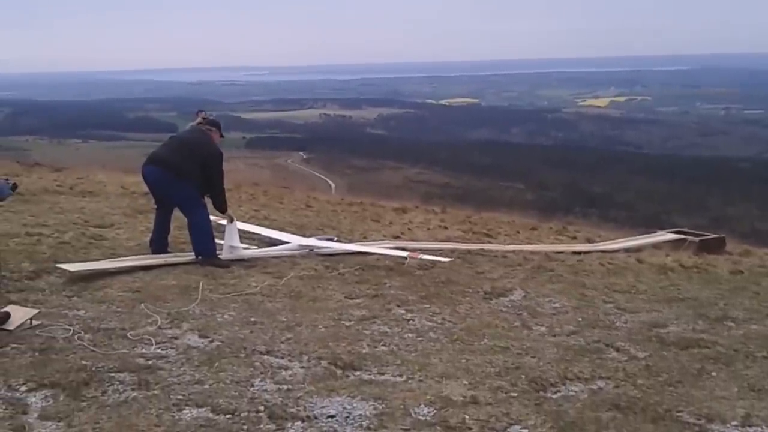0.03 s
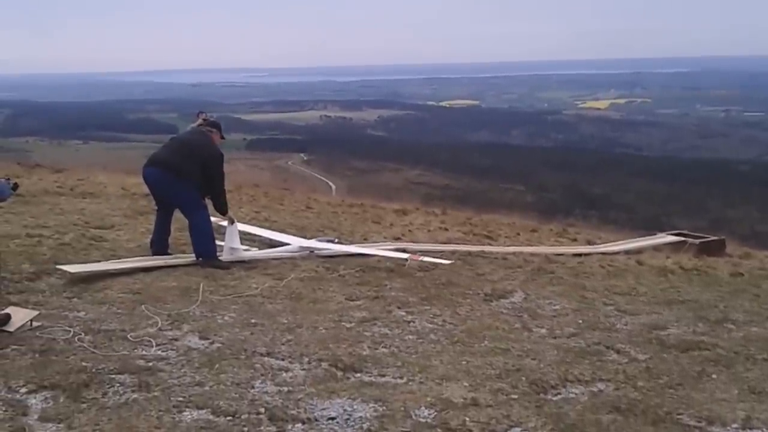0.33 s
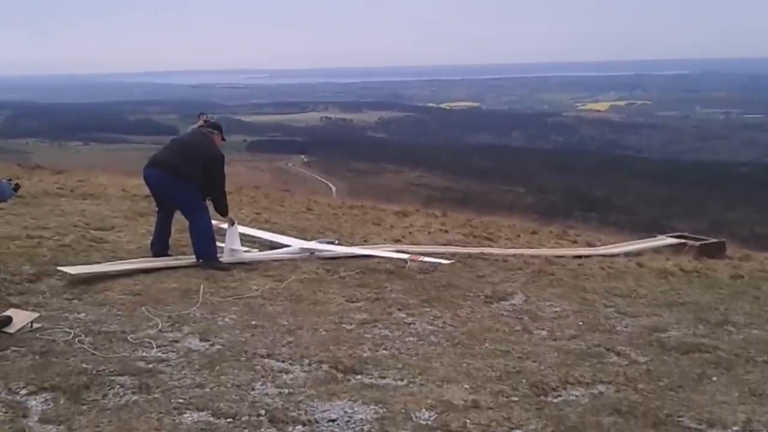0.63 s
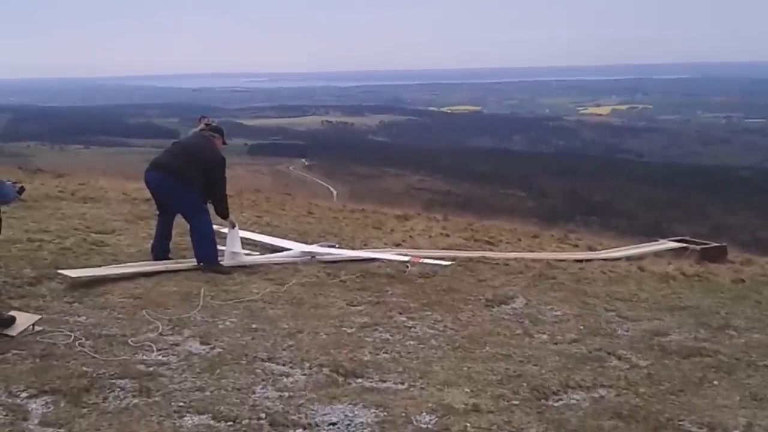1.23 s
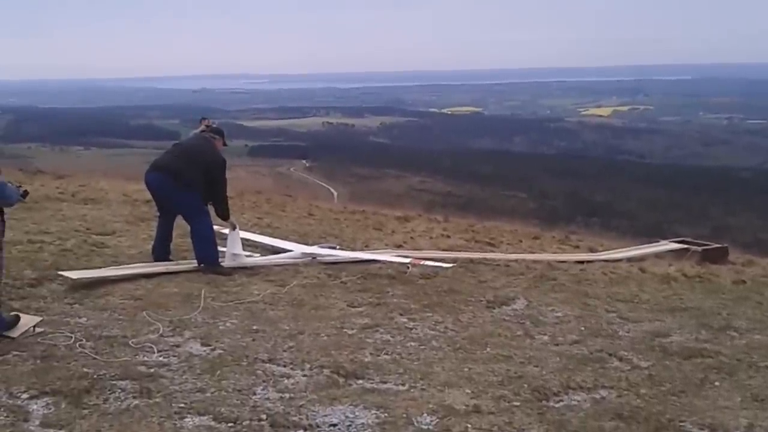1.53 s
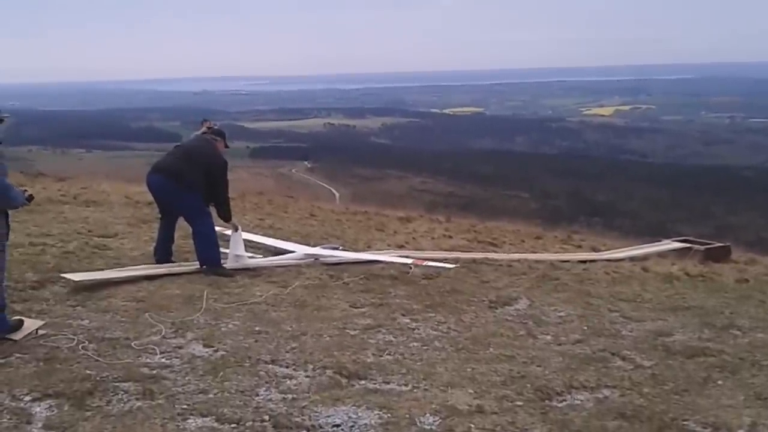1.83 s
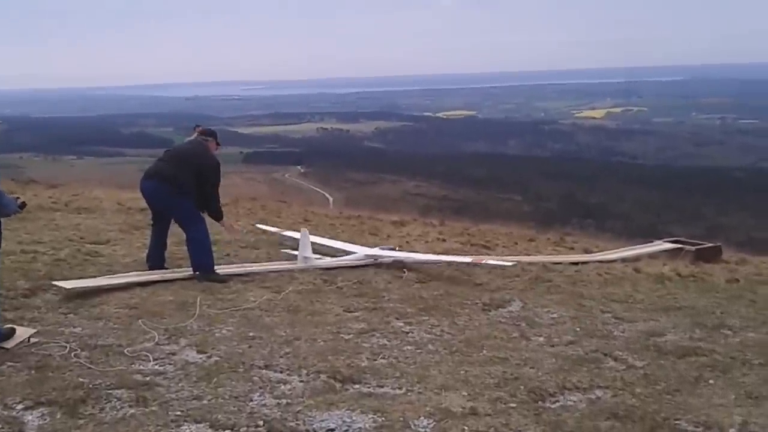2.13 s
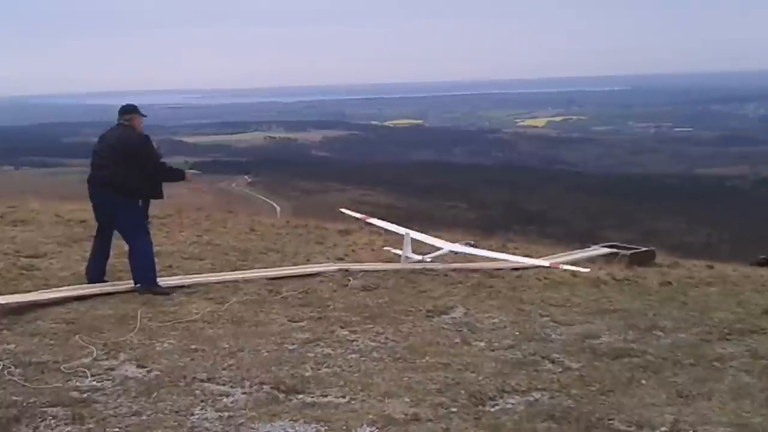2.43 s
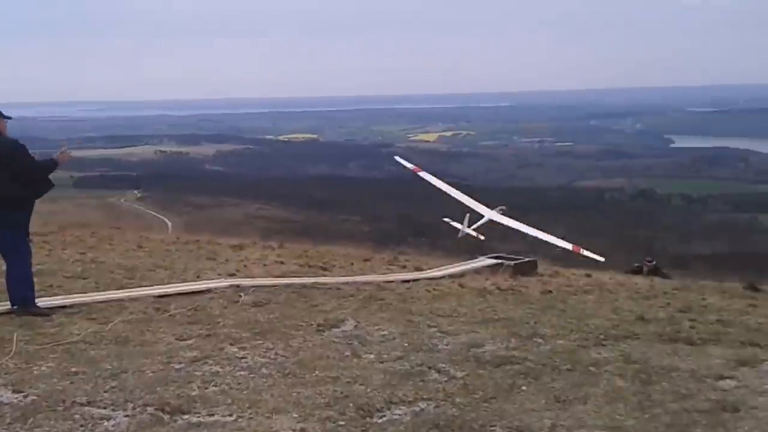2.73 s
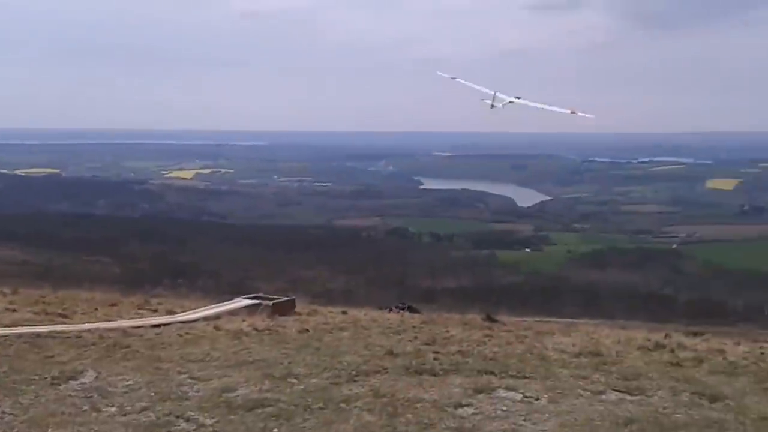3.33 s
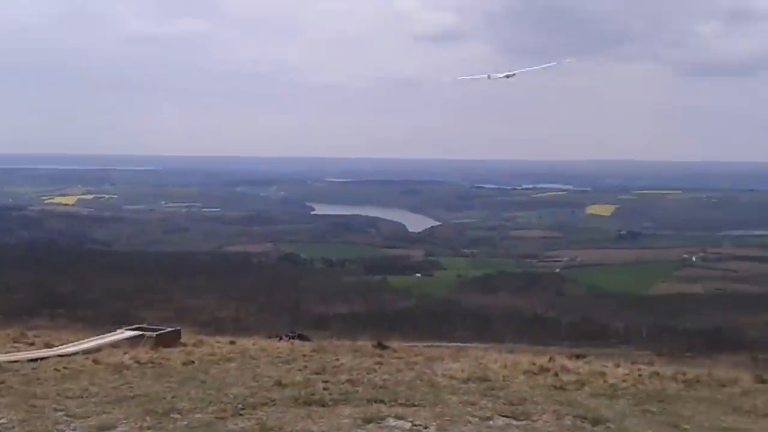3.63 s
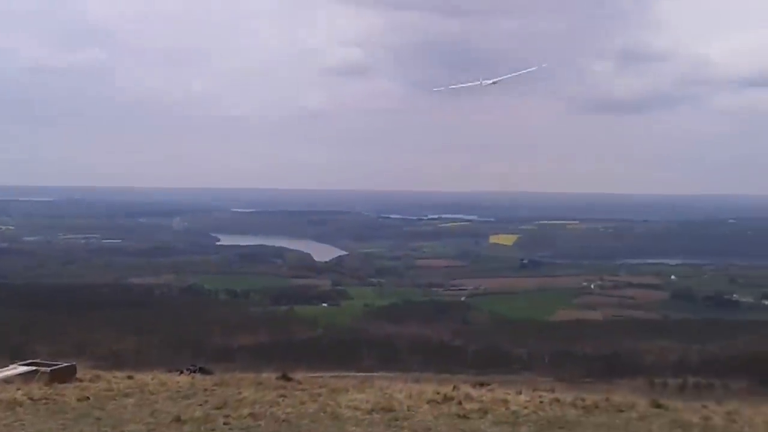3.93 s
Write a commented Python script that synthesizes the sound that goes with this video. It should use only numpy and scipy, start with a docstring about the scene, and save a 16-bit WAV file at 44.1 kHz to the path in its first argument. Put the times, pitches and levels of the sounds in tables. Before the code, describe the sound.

Gusty wind buffets the microphone while a model glider rattles faintly off a wooden ramp.

```python
"""On a grassy hilltop, gusty wind buffets a camera microphone, whistles across its port (the
small sound opening) and overloads it. Swirling air makes the rumble; air crossing the port's edge
makes the whistle. Under the wind, a model glider squeaks as it is handled, clicks on its wooden
ramp, slides away with a thin hiss and launches with a rattling, whirring rush."""
import sys
import numpy as np
from scipy import signal
from scipy.fft import rfft, irfft
from scipy.io import wavfile
from scipy.ndimage import map_coordinates

SR = 44100
rng = np.random.default_rng(int(sys.argv[2]) if len(sys.argv) > 2 else 0)


def materialize(psi):
    """Save the field psi as 16-bit PCM at rate SR to the path in sys.argv[1].

    A 1-D psi becomes a single channel; in a 2-D psi each row is a channel.
    """
    bounded = np.clip(np.atleast_2d(psi).T, -1, 1)
    quanta = np.round(bounded * 32767).astype(np.int16)
    wavfile.write(sys.argv[1], SR, quanta)


N = 176400  # 4 seconds
TIME = np.arange(N) / SR
FREQS = np.fft.rfftfreq(N, 1 / SR)


def amp(db):
    """Turns decibels into a number to multiply by."""
    return 10 ** (np.asarray(db) / 20)


def unit(x):
    """Scales a signal to an average strength (rms) of 1."""
    return x / np.sqrt(np.mean(x ** 2) + 1e-20)


def curve(table, column=1):
    """One column of a table, joined by straight lines through time."""
    rows = np.array(table, float)
    return np.interp(TIME, rows[:, 0], rows[:, column])


def on_freqs(hz, values):
    """Joins values by straight lines from low to high pitch, with octaves evenly spaced."""
    return np.interp(np.log(FREQS + 1), np.log(hz), values)


def filtered(x, gains):
    """Turns each frequency in a signal up or down by its own gain."""
    return irfft(rfft(x) * gains, N)


def noise(colour):
    """Noise shaped by (pitch_hz, level_db) rows, fading away below the lowest pitch."""
    hz, db = np.transpose(colour)
    low_cut = np.minimum(FREQS / hz[0], 1) ** 2
    return unit(filtered(rng.standard_normal(N), amp(on_freqs(hz, db)) * low_cut))


def wander(rate_hz):
    """A random wobble of strength 1, mostly slower than the given rate."""
    return unit(filtered(rng.standard_normal(N), np.exp(-(FREQS / rate_hz) ** 2)))


def flicker(depth_db, rate_hz):
    """A gain that makes the loudness waver at random."""
    return amp(depth_db * wander(rate_hz))


def steadied(x, smooth_s=.012):
    """Evens out the slow swells of a noise."""
    power = filtered(x ** 2, np.exp(-2 * (FREQS * smooth_s) ** 2))
    return x / np.sqrt(np.abs(power) + 1e-12)


# Tone of the background: pitch_hz, level_db
HISS_COLOUR = [(30, -1.5), (1300, 3), (2600, -4), (7000, -9.5), (15500, -11.5)]
def background_hiss():
    """A faint, steady hiss behind everything."""
    return amp(-59) * noise(HISS_COLOUR)


# Squeaks of the glider being handled: start_s, level_db
SQUEAKS = [(1.184, -35.5), (1.198, -36), (1.758, -36)]
# Pitches that ring in each squeak: pitch_hz, width_hz, level_db
SQUEAK_RING = [(3291, 390, -8), (4980, 210, 3.5), (5530, 240, -2.5)]
def glider_squeaks(rise_s=0.0027):
    """Brief slips make the glider ring at a few high pitches."""
    ring = sum(amp(db) / (1 + (2 * (FREQS - hz) / width) ** 2) for hz, width, db in SQUEAK_RING)
    ages = [(np.maximum(TIME - start_s, 0) / rise_s, db) for start_s, db in SQUEAKS]
    level = sum(amp(db) * age * np.exp(1 - age) for age, db in ages)
    return level * unit(filtered(rng.standard_normal(N), ring))


# Knocks and rattles on the ramp and in the air: start_s, level_db, fade_s (time to drop 60 dB)
CLICKS = [(1.808, -42.5, 0.12), (2.659, -30, 0.073), (2.747, -26.5, 0.069), (2.785, -21, 0.026),
          (2.827, -28, 0.13), (2.873, -21.5, 0.077), (2.884, -13, 0.014), (3.52, -23.5, 0.05),
          (3.546, -27.5, 0.055), (3.566, -33, 0.034)]
# How the glider's body rings: pitch_hz, level_db
BODY_RING = [(900, 1), (2000, -8), (2800, -4), (3300, -5.5), (3600, 0.5), (4020, 0), (4260, -5.5),
             (4520, 1), (4850, 2.5), (5150, -4.5), (5500, 1), (6050, -8.5), (6800, -11), (7130, -10.5),
             (7420, -15), (7800, -14.5), (10500, -25), (12400, -24.5), (15500, -31)]
def glider_clicks(rise_s=0.00081):
    """Short knocks ring the glider's light body."""
    level = np.zeros(N)
    for start_s, db, fade_s in CLICKS:
        age = np.maximum(TIME - start_s, 0)
        level += np.minimum(age / rise_s, 1) * amp(db - 60 * np.minimum(age / fade_s, 2))
    return level * noise(BODY_RING)


# The slide along the ramp: time_s, level_db, pitch_ratio
SLIDE = [(1.8, -69, 1.1), (1.87, -51.5, .99), (2.005, -44, 1.0), (2.055, -52, 1.005), (2.135, -49, .99),
         (2.17, -42.5, 1.0), (2.29, -57, 0.99), (2.8, -85.5, 0.78)]
# Tone of the scrape: pitch_hz, level_db
SLIDE_COLOUR = [(1200, -15), (3450, -13.5), (3760, 6.5), (4100, -9), (4500, -9), (4900, -1), (5250, -7),
                (5590, -5.5), (6300, -15), (15500, -44)]
def glider_slide(split_hz=4300):
    """Rubbing on the ramp makes a grainy, singing scrape whose lows and highs swell separately."""
    scrape = unit(noise(SLIDE_COLOUR) * flicker(depth_db=3, rate_hz=216))
    low = filtered(scrape, FREQS < split_hz)
    patchy = sum(part * flicker(depth_db=2.5, rate_hz=22) for part in (low, scrape - low))
    position = np.cumsum(curve(SLIDE, column=2))  # stepping through the noise slower lowers its pitch
    drifting = map_coordinates(patchy, [position], order=3, mode="wrap")
    return (TIME > SLIDE[0][0]) * amp(curve(SLIDE)) * drifting


# The rattle of the launch as the glider gathers speed: time_s, level_db
RUSH = [(2.2, -52), (2.73, -50.5), (2.91, -38.5), (3.25, -32), (3.45, -37.5), (3.55, -35.5), (3.6, -48.5),
        (3.65, -36), (4.0, -44.5)]
def launch_rush(whirr_hz=45.4, whirr_depth=0.21):
    """A rattling rush from the launch rings the glider's body and pulses in an uneven whirr."""
    cycles = np.cumsum(whirr_hz * (1 + 0.11 * wander(2.34))) / SR
    whirr = 1 + whirr_depth * np.sin(2 * np.pi * cycles)
    flutter = flicker(depth_db=3, rate_hz=216) * flicker(depth_db=2, rate_hz=50)
    return (TIME > RUSH[0][0]) * amp(curve(RUSH)) * unit(whirr * flutter * noise(BODY_RING))


def glider_chirp(start_s=3.625, rise_s=0.0056, pitch_hz=4882, fall_hz_per_s=18000, width_hz=230):
    """The body rasps briefly as the glider pulls away, with one bright, falling note."""
    age = np.maximum(TIME - start_s, 0)
    phase = 2 * np.pi * np.cumsum(pitch_hz - fall_hz_per_s * age) / SR
    tone = wander(width_hz) * np.cos(phase) + wander(width_hz) * np.sin(phase)
    level = amp(-26) * age / rise_s * np.exp(1 - age / rise_s)
    return level * unit(steadied(tone) + noise(BODY_RING))


# Crackles in hard gusts: middle_s, level_db
RASPS = [(2.927, -28), (3.112, -25.5), (3.452, -25.5), (3.815, -25)]
def wind_rasps(width_s=0.013, pitch_hz=1800):
    """Air tears across the port in short clumps of sharp crackle."""
    level = sum(amp(db) * np.exp(-.5 * ((TIME - middle_s) / width_s) ** 2) for middle_s, db in RASPS)
    grains = rng.standard_normal(N) * flicker(depth_db=15, rate_hz=180)
    colour = (FREQS / pitch_hz) ** 2 / (1 + (FREQS / pitch_hz) ** 5)
    return level * steadied(filtered(grains, colour))


USUAL_WHISTLE_HZ, STRONG_GUST_DB = 803, -6.5
# Air whistling across the port: time_s, pitch_hz, level_db (compared with the buffeting)
WHISTLE = [(0, 1035, 16), (.05, 880, 1), (.16, 740, -13), (.2, 708.3, 0), (.24, 820, -6), (.365, 922, -2),
           (.44, 702.5, -17), (.53, 783, 10.5), (.56, 800, -15.5), (.71, 823, 1), (.78, 720, -1),
           (.87, 780.7, -26.5), (.93, 756, 6), (1.0, 703.5, -33), (1.05, 876.5, -10), (1.16, 636, -2),
           (1.21, 639.7, -24), (1.32, 750, -8.5), (1.38, 833, 9.5), (1.44, 757, -29), (1.6, 700, -18),
           (1.7, 932, -1.5), (1.75, 850, -33), (1.81, 970, 0.5), (1.87, 685, -10.5), (1.92, 685.3, 5),
           (2.01, 520, -11), (2.12, 570, 1.5), (2.17, 739, -6.5), (2.195, 651.5, 19), (2.225, 829, -4),
           (2.29, 972.6, -18), (2.33, 1176, 8), (2.37, 1000, 5), (2.445, 930, 2), (2.478, 747.3, 2.5),
           (2.507, 530, 1.5), (2.55, 944.4, -6.5), (2.64, 974.5, -1.5), (2.695, 802.6, 9), (2.76, 920, -14),
           (2.815, 927, 10), (2.86, 1151, -8), (2.915, 1380, -6.5), (3.06, 950, -3.5), (3.12, 750.3, -15),
           (3.22, 959.5, -2.5), (3.4, 901, -18), (3.63, 738.6, -3.5), (3.68, 926, -9), (3.76, 777, -26),
           (4.0, 800, -7)]
def wind_whistle(gust_db, width_hz=81):
    """Air on the port's edge sings a fuzzy note, higher and rougher when it moves faster."""
    hz = curve(WHISTLE)
    waver = 0.04495 * (hz / USUAL_WHISTLE_HZ) ** 3.05 * wander(115.4)
    phase = 2 * np.pi * np.cumsum(hz * (1 + waver)) / SR
    tone = (wander(width_hz) + 1j * wander(width_hz)) * np.exp(1j * phase)
    octave = amp(gust_db - STRONG_GUST_DB - 31) * (tone ** 2).real  # grows in strong gusts
    return steadied(tone.real + octave)


# Bands of the rumble: pitch_hz, level_db (in a strong gust), growth_db_per_db (of wind force)
BUFFET_BANDS = [(20, -36.5, 2.2), (58.3, -28.5, 0.5), (117, -12.5, 0.3), (202, -3.5, 0.47),
                (266, 0.5, 0.79), (420, -1.5, 1.05), (730, -5, 1.32), (908, -8.5, 1.85), (1160, -19.5, 1.5),
                (1490, -27, 1.53), (2370, -45, 2.5), (3100, -53, 4)]
# Change of tone as the wind picks up: time_s, bass_db, treble_db
WIND_TONE = [(1.3, -1.5, -4), (2.6, 1, 2.5), (3.3, 1.5, 0.5)]
def wind_buffeting(gust_db, bass_hz=250, treble_hz=1400, top_hz=2900):
    """Swirling air at the port rumbles dully in the lulls and brightens in fast gusts."""
    hz, db, growth = np.transpose(BUFFET_BANDS)
    # A higher whistle stands for faster air.
    speed_db = 21.5 * np.log2(np.maximum(curve(WHISTLE) / USUAL_WHISTLE_HZ, 1))
    swirl_db = 4 * wander(112)
    force_db = np.minimum(np.minimum(gust_db, -5) - STRONG_GUST_DB + speed_db + swirl_db, 6)
    spectrum = rfft(rng.standard_normal(N)) / np.maximum(FREQS / top_hz, 1) ** 4
    bass_db, treble_db = curve(WIND_TONE), curve(WIND_TONE, column=2)
    air = np.zeros(N)
    for k, band in enumerate(np.eye(len(hz))):
        band_db = db[k] + growth[k] * force_db + 3 * wander(64.5)  # each swells as swirls pass
        band_db += (hz[k] < bass_hz) * bass_db + (hz[k] > treble_hz) * treble_db
        air += amp(band_db) * irfft(spectrum * on_freqs(hz, band), N)
    return steadied(air)


def choked(air, limit=.76, smooth_hz=500):
    """The port gently holds back the strongest swings of the air."""
    strength = np.abs(signal.hilbert(air))
    excess = (1 + (strength / limit) ** 8) ** (1 / 8)
    return air / filtered(excess, np.exp(-(FREQS / smooth_hz) ** 2))


# Slaps of air on the microphone: middle_s, peak_db
SLAPS = [(.068, 3), (0.169, -0.5), (.295, -6), (.679, 8), (1.02, -2), (1.224, 1.5), (1.649, 11), (1.67, 4),
         (1.674, 8), (1.763, 0), (2.248, 4.5), (2.264, 6), (2.329, 10.5), (2.338, 8.5), (2.459, 7.5),
         (2.516, 6), (2.605, 5.5), (2.875, 4), (3.098, 7), (3.433, 6), (3.839, 10.5)]
def with_slaps(air, pitch_hz=464, width_cycles=0.33):
    """Each slap of air briefly replaces the wind with one sharp swing of pressure."""
    for middle_s, db in SLAPS:
        near = np.abs(TIME - middle_s) < .01
        cycles = (TIME[near] - middle_s) * pitch_hz
        shape = np.exp(-.5 * (cycles / width_cycles) ** 2)
        air[near] = air[near] * (1 - shape) - amp(db) * shape * np.cos(2 * np.pi * cycles)
    return air


# Strength of the wind at the microphone: time_s, level_db
GUSTS = [(0.0, -6), (0.052, -25.5), (0.068, -3.5), (0.157, -24.5), (0.168, -6), (0.178, -20.5),
         (0.222, -27.5), (0.239, -7), (0.267, -31), (0.295, -9), (0.311, -23.5), (0.326, -10.5),
         (0.345, -13), (0.359, -27), (0.423, -33), (0.435, -13), (0.463, -29), (0.475, -22), (0.507, -54.5),
         (0.535, -19), (0.565, -31), (0.577, -42.5), (0.591, -23), (0.615, -40), (0.666, -22),
         (0.678, -6.5), (0.748, -25), (0.774, -6.5), (0.794, -28.5), (0.872, -21), (0.882, -10),
         (0.904, -32), (0.91, -11), (0.938, -13), (0.966, -36.5), (1.0, -16), (1.024, -0.5), (1.038, -17.5),
         (1.05, -8.5), (1.109, -49.5), (1.125, -17), (1.141, -11.5), (1.17, -12), (1.181, -31),
         (1.225, -11.5), (1.249, -24.5), (1.288, -6.5), (1.302, -34), (1.314, -17), (1.328, -39.5),
         (1.343, -25.5), (1.365, -15), (1.397, -27), (1.413, -48.5), (1.421, -24.5), (1.461, -41.5),
         (1.481, -23), (1.505, -38.5), (1.525, -18.5), (1.55, -25), (1.604, -23), (1.616, -34.5),
         (1.648, -5.5), (1.66, -12), (1.668, -4.5), (1.712, -16.5), (1.733, -9), (1.764, -9.5),
         (1.788, -27.5), (1.836, -24.5), (1.88, -42.5), (1.892, -22), (1.972, -26), (1.991, -45),
         (1.999, -24.5), (2.047, -46.5), (2.079, -17.5), (2.091, -30), (2.139, -36), (2.163, -18),
         (2.187, -7.5), (2.215, -15), (2.263, -7.5), (2.287, -26), (2.327, -4.5), (2.37, -16), (2.422, -8),
         (2.438, -20.5), (2.45, -6), (2.514, -7.5), (2.568, -30.5), (2.586, -11), (2.606, -5), (2.674, -33),
         (2.684, -11), (2.718, -6.5), (2.765, -29.5), (2.8, -30), (2.811, -9.5), (2.822, -22.5),
         (2.85, -26.5), (2.876, -0.5), (2.902, -21), (2.909, -11.5), (2.957, -19), (2.977, -1),
         (2.993, -22.5), (3.021, -11), (3.033, -21.5), (3.053, -5.5), (3.077, -17.5), (3.101, 7),
         (3.161, -13), (3.169, -5.5), (3.225, -18), (3.233, -9.5), (3.257, -24.5), (3.273, -6.5),
         (3.285, -21), (3.293, -11), (3.32, -7.5), (3.332, -24.5), (3.34, -7.5), (3.422, -14), (3.432, -7),
         (3.468, -6), (3.5, -37), (3.54, -16.5), (3.596, -35.5), (3.62, -13.5), (3.652, -8.5),
         (3.664, -24.5), (3.672, -6.5), (3.692, -13.5), (3.759, -10.5), (3.771, 2), (3.783, -14),
         (3.803, -9.5), (3.867, -8), (3.885, -11.5), (3.939, -18), (3.955, -13.5), (3.999, -11.5)]
def wind():
    """Each gust shares its strength between the buffeting and the whistle."""
    gust_db = curve(GUSTS)
    level = amp(gust_db) * flicker(depth_db=1.4, rate_hz=55)
    share = amp(curve(WHISTLE, column=2))
    blend = (wind_buffeting(gust_db) + share * wind_whistle(gust_db)) / np.sqrt(1 + share ** 2)
    return with_slaps(choked(level * blend))


def scene():
    """Loud wind, the quieter glider and a faint hiss, in one channel."""
    air = wind() + wind_rasps()
    glider = glider_squeaks() + glider_clicks() + glider_slide() + launch_rush() + glider_chirp()
    return (air + glider + background_hiss())[None]


def record(dry):
    """The overloaded microphone flattens the biggest peaks; then the highest treble is cut."""
    ceiling, hardness, top_hz = .86, 40, 15850
    flattened = dry / (1 + np.abs(dry / ceiling) ** hardness) ** (1 / hardness)
    treble_cut = signal.firwin(511, top_hz, window=("kaiser", 9), fs=SR)
    return signal.oaconvolve(flattened, treble_cut[None], "same")


dry = scene()
out = record(dry)
materialize(out)
```